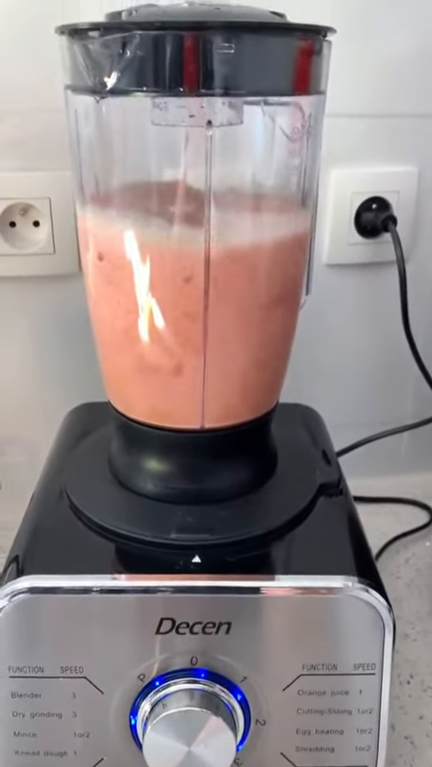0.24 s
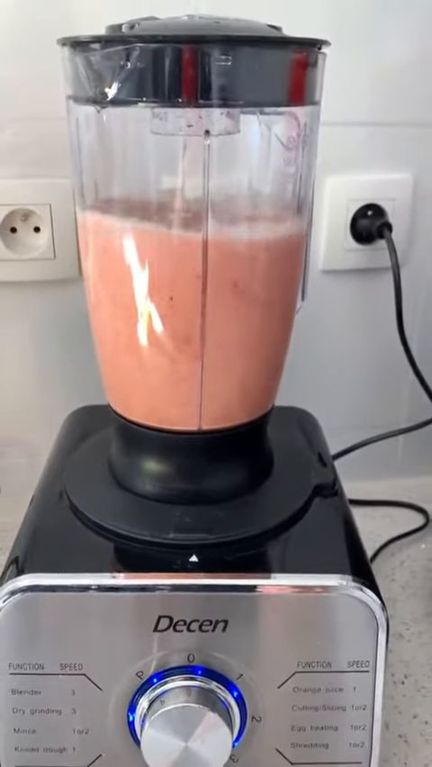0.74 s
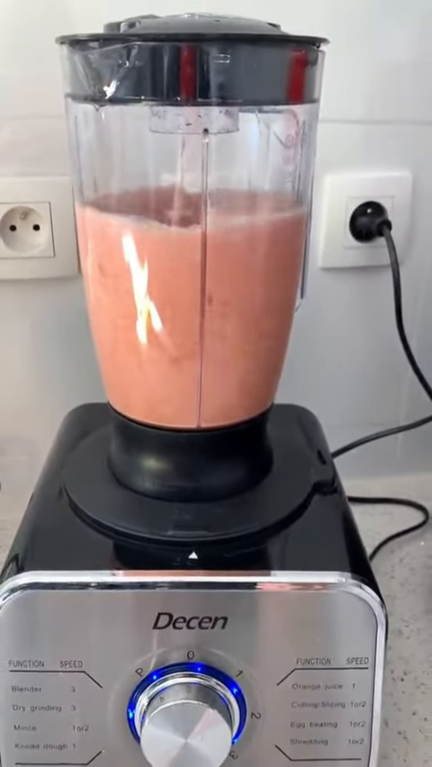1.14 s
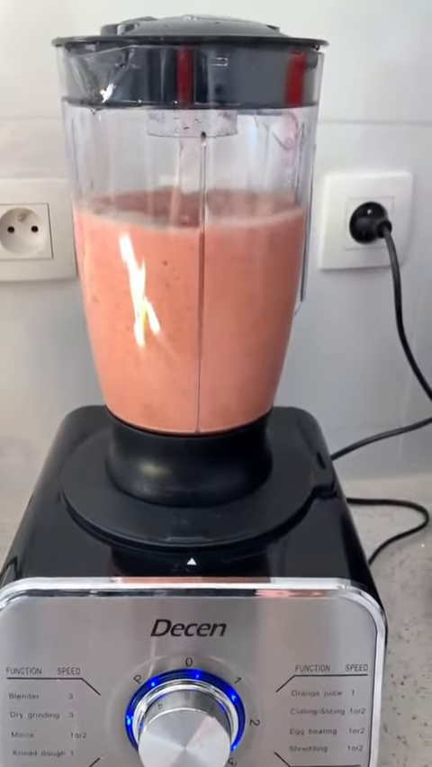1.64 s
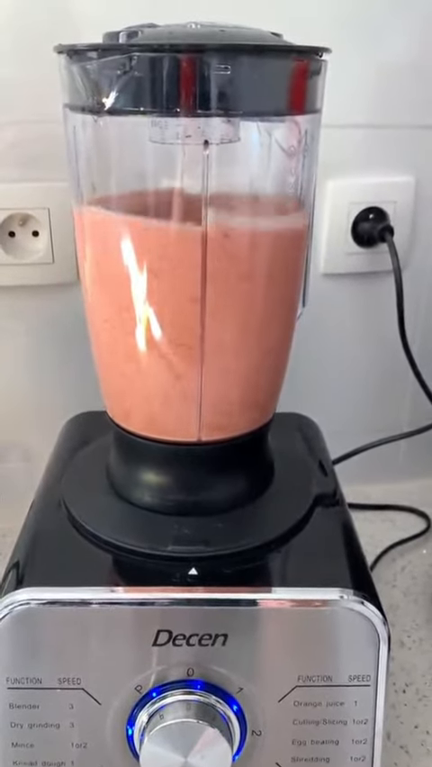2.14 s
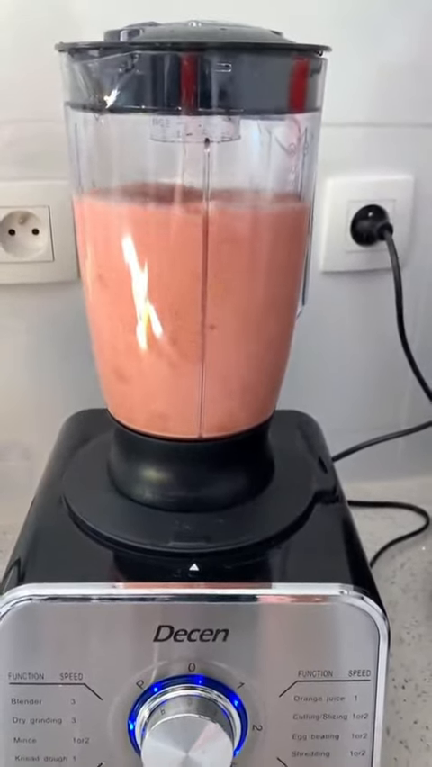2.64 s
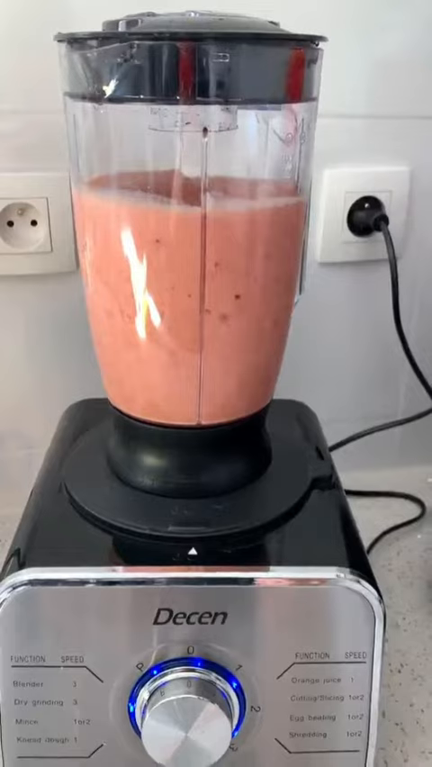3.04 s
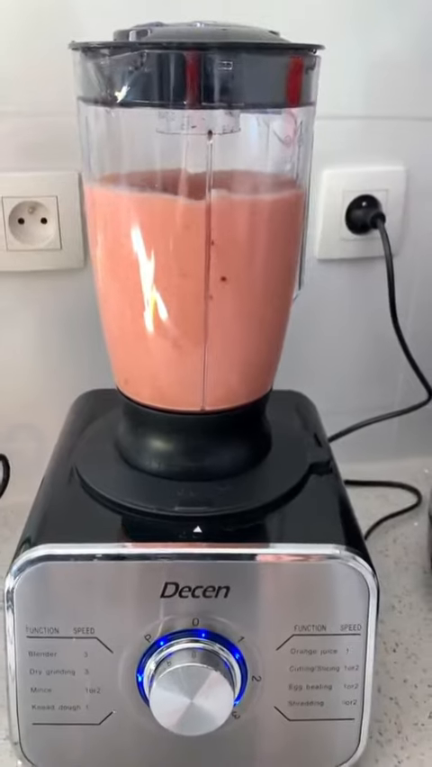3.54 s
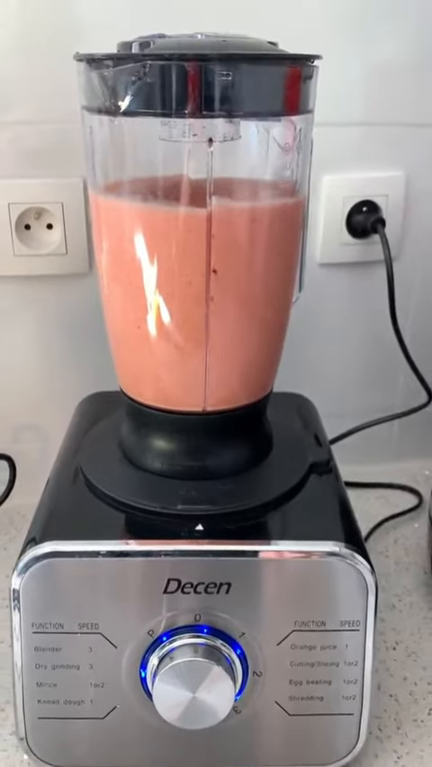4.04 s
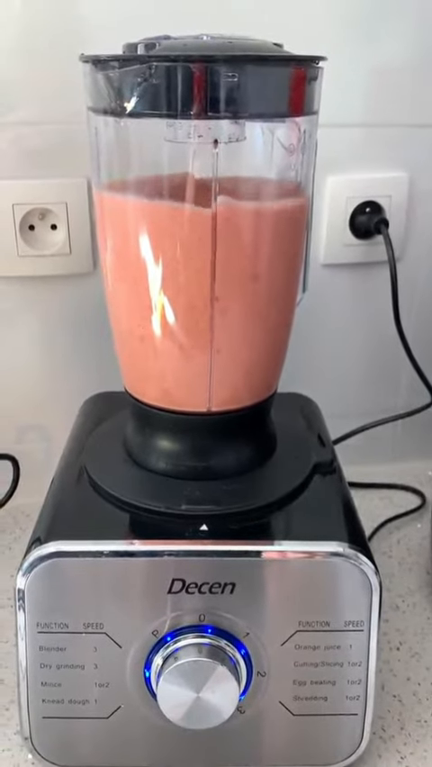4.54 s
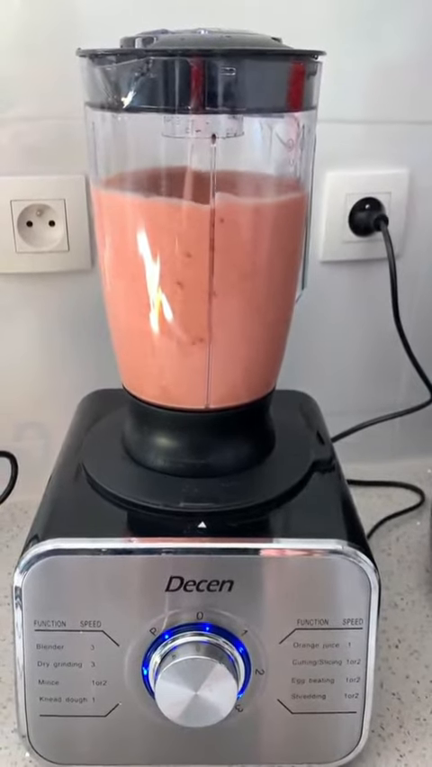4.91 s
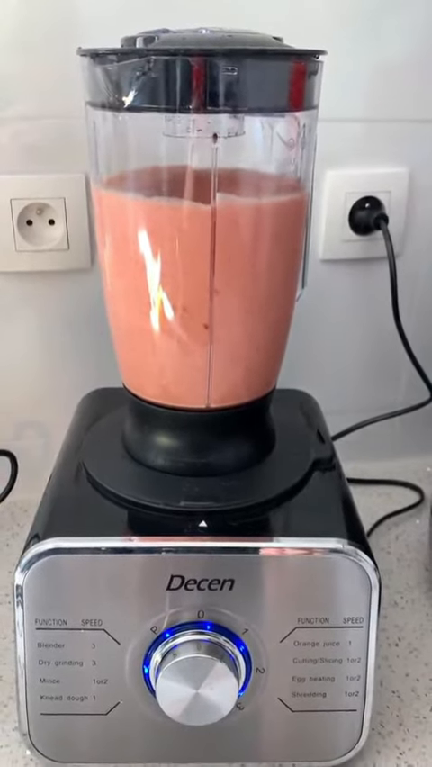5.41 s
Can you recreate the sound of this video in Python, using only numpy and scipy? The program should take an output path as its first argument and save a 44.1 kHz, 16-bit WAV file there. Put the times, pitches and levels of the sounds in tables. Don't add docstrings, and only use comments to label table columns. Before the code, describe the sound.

Loud, uneven blender grinding with dull thumps and dry clicks, settling after a second or so into an even, hissy liquid whir.

```python
import sys
import numpy as np
from scipy import signal
from scipy.fft import rfft, irfft, next_fast_len
from scipy.io import wavfile
from scipy.ndimage import uniform_filter1d, map_coordinates

SR = 44100
rng = np.random.default_rng(int(sys.argv[2]) if len(sys.argv) > 2 else 0)


def how_loud(loudness_db):
    steps = np.asarray(loudness_db, float) / 20
    return 10 ** steps


def persist_wave(psi):
    counts = np.round(np.clip(psi, -1, 1) * 32767).astype(np.int16)
    wavfile.write(sys.argv[1], SR, np.atleast_2d(counts).T)


N = 250047
SIZE = next_fast_len(N + SR // 2)
HZ = np.fft.rfftfreq(SIZE, 1 / SR)
T = np.arange(N) / SR

# (time [s], speed [Hz])
SHAFT_SPEED = [(0, 165), (.5, 167), (1.15, 169), (1.35, 194), (1.7, 189), (2.1, 193), (2.45, 195),
               (2.65, 193), (2.85, 199), (3.5, 203), (4, 205), (4.15, 212), (4.35, 206), (4.9, 208),
               (5.67, 206)]
# (time [s], load over the smooth churn [dB])
LOAD = [(0, 8.5), (.2, 4), (.5, 7), (1.17, 4.5), (1.25, -1.5), (1.33, 1), (2.0, 2), (2.4, 2), (2.55, 2),
        (2.63, -2), (2.9, 0), (3.5, -1.5), (4.06, -1), (4.3, -2), (4.9, -0.5), (5.3, -1.5), (5.67, -1)]
# (time [s], swell [dB])
SURGES = [(0.019, 4.5), (.17, 1), (.31, 1), (.38, 2), (0.458, 2.5), (0.54, 4), (.58, -2), (0.629, 2.5),
          (.76, 1), (.96, 1.5), (1.1, 3.5), (1.18, 1.5), (1.25, -3.5), (1.44, 4.5), (1.52, 3.5),
          (1.58, -3.5), (1.64, 4), (1.75, 0.5), (1.85, 0.5), (2.02, 3.5), (2.27, -3.5), (2.44, 2.5),
          (2.47, -1), (2.51, 1.5), (2.56, 3.5), (2.73, 2.5), (3.25, -2.5), (3.5, 2), (3.79, 1), (4.22, 2.5),
          (4.93, 1), (5.19, 4.5)]
# (time [s], once-a-turn swell [dB], twice-a-turn swell [dB], length [s])
WOBBLES = [
    (0, 13, 25, 0.12),
    (0.23, 1.5, 20, 0.51),
    (1.025, 11, -6, 0.24),
    (1.39, 4, -5, 0.27),
    (1.717, 10.5, 8.5, 0.17),
    (1.866, 2, 7, 0.4),
    (2.1, 2, -4, 0.21),
    (2.638, 7.5, 5, 0.21),
    (4.16, 4.5, 6.5, 0.22),
]
# (time [s], peak [dB], thud minus peak [dB])
KNOCKS = [(0.378, -35, 3), (0.534, -34, -10), (0.943, -29, -20), (1.051, -31, -15), (1.386, -32, -18),
          (1.6252, -50, -13), (2.0303, -34, -18), (2.256, -28.5, -7), (2.486, -29.5, -23),
          (2.8195, -58, -17), (3.263, -39, -11), (4.179, -38, -12), (4.814, -55, -20), (4.922, -53, 13),
          (5.184, -37, -15), (5.219, -32, -24), (5.4555, -59, -17)]
# (time [s], pitch [Hz], width [Hz], peak [dB], length [s])
PINGS = [(0, 993, 30, -47, .05), (.16, 335, 40, -44, .07), (.3, 330, 60, -47, .08),
         (.36, 1358, 25, -49, .08), (2.47, 1375, 30, -52, .06), (4.5, 1792, 12, -64, 3),
         (4.8, 1298, 12, -69, 2), (3.78, 1788, 20, -53, .06), (3.78, 1385, 20, -57, .1),
         (.6, 1360, 60, -56, 1.1), (5.22, 2020, 60, -50, .04), (5.25, 1786, 20, -54, .1)]
# (time [s], peak [dB], pitch [Hz])
THUMPS = [(0.008, -42, 330), (0.048, -46, 312), (0.145, -32.5, 342), (0.216, -48, 336), (0.255, -53, 353),
          (0.311, -39, 339), (0.377, -32.5, 334), (0.446, -36, 316), (0.516, -32.5, 306), (0.544, -31, 351),
          (0.585, -34, 334), (0.623, -35.5, 323), (0.663, -42, 287), (0.722, -55, 314), (0.763, -44, 357),
          (0.79, -38, 331), (0.841, -44, 333), (0.953, -45, 330), (0.998, -45, 361), (1.077, -36, 346),
          (1.106, -34, 305), (1.174, -37, 339), (1.208, -39, 299), (1.312, -62, 318), (1.357, -43, 354),
          (1.4, -42, 342), (1.489, -43, 336), (1.524, -41, 295), (1.562, -42, 328), (1.604, -40, 324),
          (1.673, -43, 347), (1.709, -46, 330), (1.851, -59, 323), (1.925, -48, 343), (1.968, -46, 296),
          (2.091, -41, 336), (2.269, -54, 332), (2.302, -54, 320), (2.46, -49, 317), (2.513, -43, 345),
          (2.56, -35, 342), (2.683, -55, 410), (2.722, -44.5, 350), (3.053, -56, 309), (3.295, -48, 333),
          (3.41, -47, 304), (3.724, -47, 310), (3.789, -48.5, 349), (4.177, -48, 360), (4.26, -43.5, 343),
          (4.395, -47, 315), (4.428, -48, 344), (4.599, -48, 338), (4.933, -50, 335), (4.988, -52, 320),
          (5.069, -63, 288), (5.118, -45, 320), (5.19, -43, 356), (5.265, -51, 318), (5.323, -49, 316)]
# (time [s], peak [dB])
TICKS = [(0.023, -34), (0.054, -39), (0.0942, -35), (0.1211, -39), (0.149, -40), (0.169, -43), (0.25, -37),
         (0.3007, -42), (0.3775, -36), (0.448, -39), (0.534, -30), (0.6814, -37), (0.7437, -34),
         (0.7746, -40), (0.9408, -40), (0.9544, -27), (1.0518, -30.5), (1.5184, -42), (1.708, -37),
         (1.8407, -38), (2.0303, -41), (2.1395, -38.5), (2.256, -43), (2.4354, -41), (2.4638, -38),
         (2.4866, -24.5), (2.6624, -40), (3.3762, -44), (3.7534, -42), (4.0352, -40), (4.1806, -37),
         (4.4792, -41), (4.6944, -39), (4.9197, -46), (5.064, -38), (5.3862, -41)]
# (time [s], stray sound [dB], length [s])
SPLASHES = [(.2, -2, .25), (.42, 5, .06), (.72, -7, .45), (1.17, 5, .1), (1.5, -4, .25), (1.8, 5, .09),
            (2.02, -3, .15), (2.26, 6, .04), (2.36, -3, .1), (2.49, 12, .1), (2.57, -5, .05),
            (3.05, 7, .08), (3.55, 8, .1), (4.12, -8, .42), (4.37, 7, .1), (4.55, 4, .05), (4.91, 7, .06),
            (5.25, -7, .5)]
# (time [s], extra lag between the ports [microseconds])
HAND_TURN = [(0, 0), (1.2, 1.5), (2.5, 0), (3.7, 0), (4.1, -4), (5.67, -4.5)]

# (pitch [Hz], width [Hz], level [dB])
HOUSING_MODES = [(269.6, 24, -11), (304.5, 17.4, -3), (339.8, 21.7, -2), (361.8, 14.3, -4), (439, 22, -1.5)]
JAR_MODES = [(598.5, 45, 4.9), (653, 14.2, 7.8), (820, 97, 5.2), (992.6, 12.6, 5.7), (1044, 40, 7.7),
             (1176, 19, 4), (1238, 20, 4), (1311, 20, 5.1), (1364, 43, 6), (1501, 11.6, 8.5),
             (1640, 14, 5.9), (1780, 18.5, 8.8), (1866, 71, 4.4), (2004, 16, 3.4), (2030, 18, 6.4),
             (2150, 45, 2.5), (2336, 62, 7.5)]
LID_MODES = [(4130, 74, 0.22), (5230, 1180, 3.3), (6760, 136, 6.2), (7670, 73, 3.6), (7870, 190, 1.6),
             (10220, 95, 0.57)]
# (frequency [Hz], level [dB per Hz])
RUMBLE_COLOUR = [(20, -30), (45, -20), (80, -8.5), (130, -2), (220, -4), (380, -16), (520, -12.5),
                 (900, -38)]
SLOSH_COLOUR = [(250, -27), (500, -5), (650, 1), (900, 1), (1200, 2), (1400, -18), (2000, -25.5)]
CHURN_COLOUR = [(700, -24), (1100, -5), (1300, 0), (1700, 0), (2400, -0.5), (2800, -0.5), (4000, -13),
                (8000, -25.5)]
SPRAY_COLOUR = [(1500, -73), (2600, 1.5), (3200, 2.5), (5200, -6.5), (5800, -5), (7000, -1.5), (8600, -5),
                (9700, -10), (12000, -11.5), (15300, -20), (15800, -34), (16300, -85)]
TICK_COLOUR = [(500, -30), (1200, 3), (2200, 16), (3200, -14), (5200, -15), (7500, 14.5), (11000, -8.5),
               (15300, -1)]
# (frequency [Hz], likeness [0-1], left leads [rad])
PORTS = [(60, .96, 0), (330, .94, -.3), (700, .5, -2.7), (1250, .2, -2.4), (1800, .6, 0), (2300, .3, 2.1),
         (2600, .4, 2.8), (2800, .92, 3.1), (3300, .9, 3.05), (3550, .55, 2.45), (3950, .52, 1.9),
         (4400, .5, 2.2), (4800, .87, 2.95), (5050, .95, 3.1), (5450, .97, 3.25), (5700, .68, 3.6),
         (6400, .55, 4.4), (7300, .75, 5.5), (7700, .965, 6.2), (9550, .96, 6.35), (9800, .35, 7.9),
         (10700, .45, 8.5), (11100, .64, 9.1), (11800, .6, 9.8), (12300, .45, 10.5), (13500, .6, 12),
         (13900, .975, 12.55), (16000, .975, 12.6)]
# (frequency [Hz], left minus right [dB])
BALANCE = [(60, 0), (110, -2), (200, -2), (380, -1), (700, -3), (1290, -5.5), (2380, -1), (4400, 0.5),
           (8120, 0.5), (15000, 0.5)]


def over_hz(table, column=1):
    rows = np.array(table)
    return np.interp(np.log(HZ + 1), np.log(rows[:, 0] + 1), rows[:, column])


def over_time(table):
    s, value = np.transpose(table)
    return np.interp(T, s, value)


def walk(rate):
    hold = int(SR / rate)
    steps = np.repeat(rng.standard_normal(N // hold + 1), hold)
    x = uniform_filter1d(uniform_filter1d(steps, hold), hold)[:N]
    return x / x.std()


def swells(times, sizes, lengths):
    total = 0
    for s, size, length in zip(times, sizes, lengths):
        total = total + np.outer(size, np.exp(-(2 * (T - s) / length) ** 2))
    return total


def tail(x, t60):
    return signal.lfilter([1], [1, -np.exp(-2 * np.log(1000) / (t60 * SR))], x)


def body(colour, modes):
    gain = how_loud(over_hz(colour)) ** 2
    for hz, width, db in modes:
        gain = gain * (1 + how_loud(2 * db) / (1 + (2 * (HZ - hz) / width) ** 2))
    cepstrum = irfft(np.log(gain) / 2, SIZE)
    cepstrum[1:SIZE // 2] *= 2
    cepstrum[SIZE // 2 + 1:] = 0
    response = np.exp(rfft(cepstrum))
    return response / np.sqrt(np.mean(np.abs(response) ** 2))


def ring(power, response, spot=1, flung=False):
    near, far = rfft(np.sqrt(power) * rng.standard_normal((2, N)), SIZE) * response
    like = spot * over_hz(PORTS)
    lean = how_loud(over_hz(BALANCE) / 2)
    shared = like * np.exp(-1j * over_hz(PORTS, column=2)) * near / lean
    stray = np.sqrt(1 - like ** 2) * far / lean
    if not flung:
        return irfft([near * lean, shared + stray], SIZE)[:, :N]
    fickle = like ** 2
    parts = [near * lean, shared + (1 - fickle) * stray, fickle * stray]
    left, steady, moving = irfft(parts, SIZE)[:, :N]
    rows = np.array(SPLASHES)
    splash_db = swells(rows[:, 0], rows[:, 1:2], rows[:, 2])[0]
    return np.array([left, steady + how_loud(walk(20) + splash_db) * moving])


def unbalance(speed):
    rows = np.array(WOBBLES)
    over = np.maximum(speed - 193, 0)
    once, twice = swells(rows[:, 0], rows[:, 1:3], rows[:, 3])
    once_db = -64 - 0.079 * over + once
    twice_db = -72 + 8.5 * np.minimum(over / 14, 1) + twice
    return once_db, twice_db


def motor(turn, once_db, twice_db):
    once = np.sqrt(2) * how_loud(once_db - 1 + 2.6 * walk(14)) * np.sin(turn + 0.5 * walk(25))
    twice = np.sqrt(2) * how_loud(twice_db - 3 + 3.8 * walk(14)) * np.sin(2 * turn + 0.9 * walk(30))
    mains_hz, width_hz, mains_db = 101, 11, -65
    peak = signal.iirpeak(mains_hz, mains_hz / width_hz, SR)
    mains = signal.lfilter(*peak, rng.standard_normal(N))
    hum = how_loud(mains_db) * mains / mains.std()
    return (once + twice + hum) * how_loud(np.array([[-.7], [.7]]))


def effort():
    load, rows = over_time(LOAD), np.array(SURGES)
    surge = swells(rows[:, 0], rows[:, 1:], np.full(len(rows), 0.052))[0]
    thud_db = -60 + 1.59 * load + 0.24 * surge
    slosh_db = -59.5 + 1.26 * load + 0.46 * surge
    churn_db = -53 + 0.42 * load + surge
    spray_db = -56.5 + 0.84 * load + 0.68 * surge
    return thud_db, slosh_db, churn_db, spray_db


def strikes(rate, spread_db, t60):
    hit = rng.random(N) < rate / SR
    size = np.minimum(rng.exponential(size=N), 4)
    power = tail(hit * how_loud(2 * spread_db * size), t60)
    return power / power.mean()


def knocks(t60, thud):
    rows, x = np.array(KNOCKS), np.zeros(N)
    level = rows[:, 1] + rows[:, 2] if thud else rows[:, 1]
    x[(rows[:, 0] * SR).astype(int)] = how_loud(2 * level)
    return tail(x, t60)


def kitchen():
    t60, scatter_db = .3, -12
    t = T[:SR // 2]
    scatter = rng.standard_normal(SR // 2) * how_loud(-60 * t / t60) * (t > .003)
    scatter = rfft(scatter / np.linalg.norm(scatter), SIZE)
    return (1 + how_loud(scatter_db) * scatter) / np.sqrt(1 + how_loud(2 * scatter_db))


def blending(turn, thud_db, slosh_db, churn_db, spray_db):
    gulp, room = walk(28), kitchen()
    impacts = strikes(rate=540, spread_db=5.0, t60=0.11)
    pulse = 1 + 0.14 * np.cos(turn)

    thud = how_loud(2 * (thud_db + 0.21 * walk(21.3) + 2.5))
    thud = thud * (0.46 + 0.6 * strikes(rate=73, spread_db=0.0, t60=0.11))
    slosh = how_loud(2 * (slosh_db + 1.3 * walk(26.54) + 3.0)) * pulse
    slosh = slosh * (1.53 + 0.3 * strikes(rate=270, spread_db=-14, t60=0.19))
    churn = how_loud(2 * (churn_db + 0.09 * gulp + 0.52 * walk(24.0) + 3.0)) * pulse
    churn = churn * (0.77 + 0.39 * impacts)
    spray = how_loud(2 * (spray_db + 0.12 * gulp + 5.0)) * (0.81 + 0.5 * impacts) * pulse

    rattle = knocks(0.088, thud=False)
    heavy = knocks(0.088, thud=True)
    housing = [(hz, width, db + 16.0) for hz, width, db in HOUSING_MODES]
    mix = ring(thud + how_loud(-20) * heavy, body(RUMBLE_COLOUR, housing))
    mix += ring(slosh + how_loud(-41.5) * rattle, room * body(SLOSH_COLOUR, JAR_MODES))
    mix += ring(churn + how_loud(-22.0) * rattle, room * body(CHURN_COLOUR, JAR_MODES))
    mix += ring(spray + how_loud(-25.0) * rattle, room * body(SPRAY_COLOUR, LID_MODES), flung=True)
    return mix


def patchy_treble(x):
    patch_db, patch_hz, patch_s, from_hz = 3.5, 45, .09, 2000
    hz, s, z = signal.stft(x, SR, nperseg=1024)
    field = rng.standard_normal(z.shape[1:])
    field = uniform_filter1d(field, round(patch_hz / hz[1]), axis=0)
    field = uniform_filter1d(field, round(patch_s / s[1]), axis=1)
    treble = np.clip(hz / from_hz - .5, 0, 1)[:, None]
    gain = how_loud(patch_db * field / field.std() * treble)
    gain = gain / np.sqrt(np.mean(gain ** 2, axis=1, keepdims=True))
    return signal.istft(z * gain, SR)[1][:, :N]


def pings():
    out = 0
    for s, hz, width, db, length in PINGS:
        unit = np.sqrt(4 * SR / np.pi / width)
        resonance = unit / (1 + 1j * (HZ - hz) / width) ** 2 / 2
        out = out + ring(how_loud(2 * db) * np.exp(-(2 * (T - s) / length) ** 2), resonance)
    return out


def thumps():
    rise_s, t60, sag = 0.0033, 0.1, 0.53
    out, t = np.zeros((2, N + SR)), T[:SR // 5]
    shape = (1 - np.exp(-t / rise_s)) ** 2 * how_loud(-60 * t / t60)
    shape = shape / shape.max()
    for (s, db, hz), (start, skew) in zip(THUMPS, rng.random((len(THUMPS), 2))):
        between_ports = np.array([[0], [1.1 * skew - .2]])
        phase = 2 * np.pi * (start + hz * t * (1 - sag * t)) + between_ports
        first = int(s * SR)
        out[:, first:first + len(t)] += how_loud(db - 4.5) * shape * np.cos(phase)
    return out[:, :N] * how_loud(np.array([[-.8], [.8]]))


def ticks():
    rows, x = np.array(TICKS), np.zeros(N)
    level_db = -8.5 - 36.5 + 0.78 * (rows[:, 1] + 34.0)
    x[(rows[:, 0] * SR).astype(int)] = how_loud(2 * level_db)
    power = tail(x, 0.068) + how_loud(2 * 5.5) * tail(x, 0.013)
    return ring(power, body(TICK_COLOUR + [(16000, -70)], LID_MODES), spot=.75)


def scene():
    speed = over_time(SHAFT_SPEED)
    turn = 2 * np.pi * np.cumsum(speed * (1 + 0.005 * walk(20))) / SR
    mix = motor(turn, *unbalance(speed))
    mix = mix + patchy_treble(blending(turn, *effort()))
    return mix + pings() + thumps() + ticks()


def roll_off(x):
    return signal.sosfilt(signal.butter(12, 15790, fs=SR, output="sos"), x)


def record(dry):
    lag = (over_time(HAND_TURN) + 1.6 * walk(9)) * 1e-6 * SR
    right = map_coordinates(dry[1], [np.arange(N) - lag], order=5, mode="nearest")
    treble_end = signal.ellip(8, .2, 60, 15750, fs=SR, output="sos")
    mix = signal.sosfilt(treble_end, [dry[0], right])
    return roll_off(mix)


dry = scene()
out = record(dry)
persist_wave(out)
```